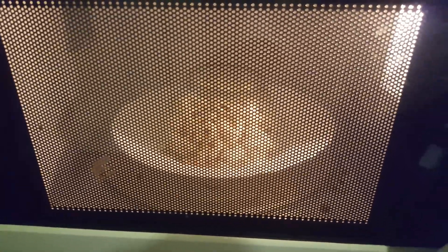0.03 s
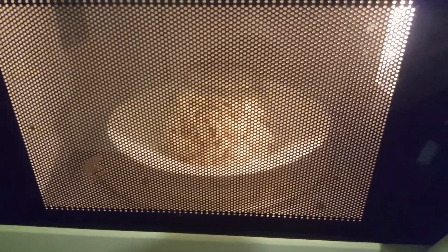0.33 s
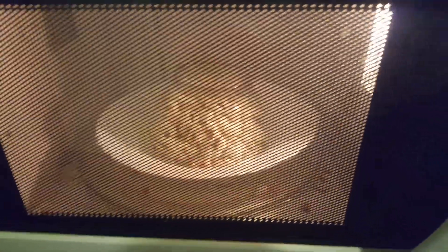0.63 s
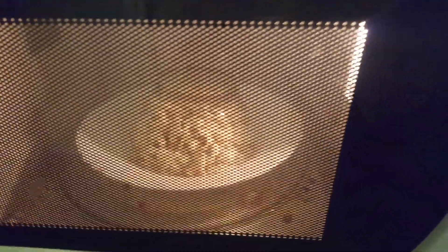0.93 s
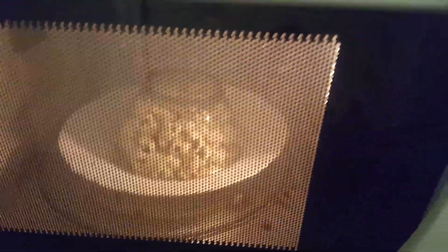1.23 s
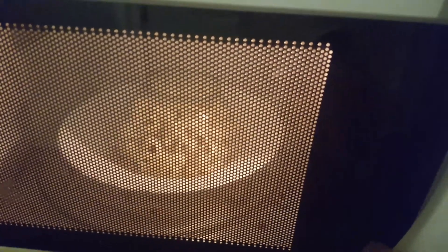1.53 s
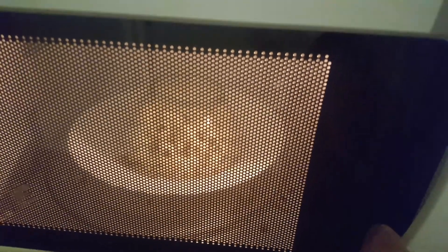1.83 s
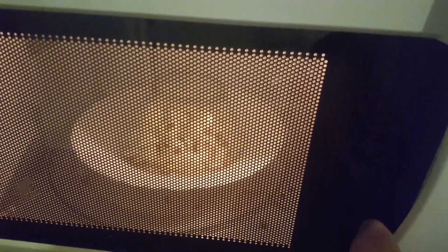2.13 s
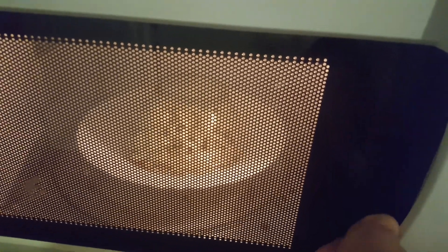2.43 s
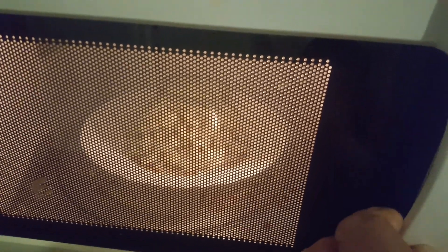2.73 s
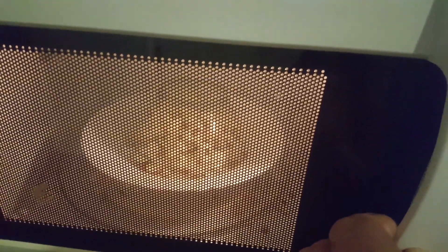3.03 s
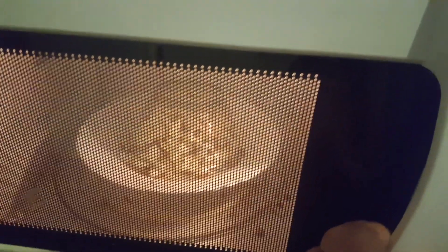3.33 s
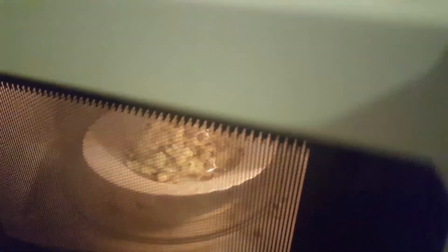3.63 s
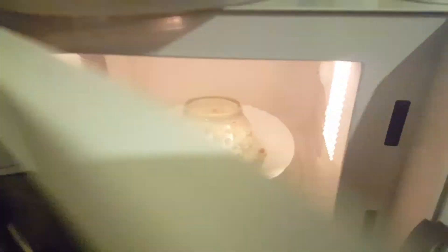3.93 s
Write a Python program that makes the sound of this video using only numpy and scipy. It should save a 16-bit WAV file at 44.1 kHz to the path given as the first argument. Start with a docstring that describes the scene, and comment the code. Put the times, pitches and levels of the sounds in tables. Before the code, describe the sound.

A microwave oven hums with a few faint popcorn pops, then its door clatters open.

```python
"""A small kitchen, close to the door of a running microwave oven. The transformer hums at harmonics of
the mains, the fan drones over the rush of its air, and a few popcorn kernels burst against the dish.
A thumb presses the door button, the power cuts, and the latch springs open with a clatter whose impacts
excite the modes of the steel cabinet and reverberate in the room. The fan coasts down, its drone
falling in pitch and level."""
import sys
import numpy as np
from scipy import signal
from scipy.fft import rfft, irfft
from scipy.io import wavfile

SR = 44100
rng = np.random.default_rng(int(sys.argv[2]) if len(sys.argv) > 2 else 0)


def materialize(psi):
    """Save the field psi as 16-bit PCM at rate SR to the path in sys.argv[1].

    A 1-D psi becomes a single channel; in a 2-D psi each row is a channel.
    """
    bounded = np.clip(np.atleast_2d(psi).T, -1, 1)
    quanta = np.round(bounded * 32767).astype(np.int16)
    wavfile.write(sys.argv[1], SR, quanta)


N = 176400
TIME = np.arange(N) / SR

# Balance of the two microphone ports (pan is left minus right): frequency_hz, pan_db
STEREO_BALANCE = [(280, 0), (420, 6), (600, -1.5), (1600, -4.5), (2800, -1), (3600, 9.5), (5200, 6),
                  (8500, 20.5), (13000, 8.5)]
# Likeness of the noise at left and right: frequency_hz, correlation
STEREO_CORRELATION = [(350, 0.93), (700, 0.25), (1400, 0.05)]
# Reverberation time of the kitchen: frequency_hz, t60_s
ROOM_DECAY = [(150, 0.36), (2000, .42), (5000, 0.51), (12000, 0.17)]
# Spectrum of the faint hiss: frequency_hz, relative_density_db
HISS_SPECTRUM = [(7000, -6), (15500, -10.5)]
# Envelope of the hiss: time_s, level_db
HISS_ENVELOPE = [(0, -84), (.3, -66), (1.85, -71), (1.97, -60), (2.8, -65.5), (4, -63)]
# Partials of the transformer hum: mains_multiple, level_db, pan_db
HUM_PARTIALS = [(2.004, -31, 2), (4.03, -46, -2.5), (4.993, -47, -1), (5.92, -46, 1), (12.9, -50.5, -2),
                (14.01, -53, -7.5), (14.97, -55.5, 8.5), (29.92, -59.5, -1.5)]
# Harmonics of the fan drone: shaft_multiple, level_db, pan_db, waver_db
FAN_HARMONICS = [(2, -54, 3, 1), (3, -44, 13, 2.5), (4, -23, 1.7, .5), (7, -46, -7, 4), (8, -47, 2.5, -1.5)]
# Spectrum of the fan's air: frequency_hz, relative_density_db
AIR_SPECTRUM = [(35, -18.5), (60, -11.5), (120, 3), (200, -2.5), (285, -0.5), (345, -5), (460, -3.5),
                (540, -8.5), (690, -7.5), (1030, -15), (1170, -12), (1370, -12.5), (1540, -12.5),
                (1780, -16), (2250, -20), (4500, -38), (8500, -46.5), (10500, -56.5), (15500, -56)]
# Spectrum of a soft rub: frequency_hz, relative_density_db
RUB_SPECTRUM = [(2000, -7), (3500, 1), (6000, -4.5), (10000, -17.5)]
# Kernels bursting against the dish: start_s, level_db, tilt_db_per_octave
KERNEL_BURSTS = [(1.4426, -25, 0.5), (1.773, -30.5, -7.5), (2.433, -36, 3.5)]
# Modes of the dish: pitch_hz, relative_level_db
DISH_MODES = [(690, -5.5), (1130, -1.5), (1490, -5), (2340, -8.5), (3015, -6.5)]
# Small high snaps: start_s, level_db, pitch_hz
HIGH_SNAPS = [(2.433, -45, 7650), (3.188, -52, 7300), (3.252, -40, 8330)]
# Creaks and clicks of the plastic button: start_s, level_db, tilt_db_per_octave, t60_s
BUTTON_CLICKS = [(3.252, -32, 5, 0.066), (3.276, -35, 2, .06), (3.366, -46, 8, 0.033),
                 (3.392, -49.5, 8.5, 0.13), (3.414, -30.5, 3.5, 0.11)]
# Knocks of the linkage and the door: start_s, level_db, tilt_db_per_octave, t60_s
DOOR_KNOCKS = [(3.364, -32.5, -11.5, 0.29), (3.452, -22, -3, 0.098), (3.458, -14.5, 2, 0.04),
               (3.463, -16, -3.5, 0.12), (3.481, -29.5, 6, 0.16), (3.502, -13.5, 2, 0.034),
               (3.507, -8, 2, 0.04), (3.511, -12.5, -5, 0.064), (3.529, -9, 1, 0.07),
               (3.544, -15, -4.5, 0.066), (3.554, -19, -3.5, 0.078), (3.804, -37, -3, .06)]
# Spectrum of a contact on door and cabinet: frequency_hz, relative_density_db
CONTACT_SPECTRUM = [(50, -22.5), (300, -6.5), (550, -2.5), (700, 2), (860, -1), (1750, 2.5), (2900, -8),
                    (3700, -16), (7000, -23), (8500, -23), (10000, -33.5), (13000, -33), (15500, -38.5)]
# Modes of the steel cabinet: pitch_hz, relative_level_db, t60_s, pan_db
CABINET_MODES = [(121.6, -25.5, 0.66, 2), (568.4, -14.5, 0.21, 1), (665, -15, 0.16, -7.5),
                 (709, -18, 0.39, -7), (1270, -14, 0.18, 2.5), (1460, -35, 1.38, -20.5),
                 (1704, -14.5, .11, -11), (1894, -20.5, 0.12, 6), (2019, -31.5, 0.67, -15),
                 (2860, -27.5, 0.16, -9.5), (3100, -29, 0.13, 9), (3628, -44, 0.7, 10)]

MAINS_HZ, TILT_PIVOT_HZ = 49.995, 1470


def from_db(db):
    """Amplitude grows tenfold for every 20 dB."""
    return 10 ** (np.asarray(db) / 20)


def at_hz(points, hz):
    """Interpolation of a table on a logarithmic frequency axis."""
    frequencies, values = np.transpose(points)
    return np.interp(np.log(hz), np.log(frequencies), values)


def panned(db):
    """A level difference gives direction: left and right gains whose mean is 1."""
    left = 2 / (1 + from_db(-np.atleast_1d(db)))
    return np.array([left, 2 - left])


def drift(corner_hz):
    """Low-pass filtered noise gives a random fluctuation with a standard deviation of 1."""
    step, settling = 40, 2000  # samples per draw; draws discarded while the filter settles
    pole = np.exp(-2 * np.pi * corner_hz * step / SR)
    white = rng.standard_normal(N // step + settling + 2)
    slow = signal.lfilter([1], [1, -2 * pole, pole * pole], white)[settling:]
    return np.interp(np.arange(N) / step, np.arange(len(slow)), slow / slow.std())


def swell(peak_s, rise_s, fall_s):
    """A Gaussian envelope with separate widths for rise and fall."""
    return np.exp(-((TIME - peak_s) / np.where(TIME < peak_s, rise_s, fall_s)) ** 2)


def damped(age_s, t60_s, attack_s=.00048):
    """Damping makes a vibration decay exponentially after its quick onset."""
    return (1 - np.exp(-age_s / attack_s)) * np.exp(-np.minimum(np.log(1000) * age_s / t60_s, 20))


def tone(cycles, rms_db, pan_db):
    """Simple harmonic motion that follows a running count of cycles."""
    return np.sqrt(2) * from_db(rms_db) * panned(pan_db) * np.sin(2 * np.pi * (cycles + rng.random()))


def noise(spectrum, ripple_depth_db=.96, ripple_spacing_hz=60):
    """Stereo noise of rms 1; interference of early reflections in the room ripples its spectrum."""
    hz = np.maximum(np.fft.rfftfreq(N, 1 / SR), 1)
    correlation = np.clip(at_hz(STEREO_CORRELATION, hz), -1, 1)
    mid, side = rfft(rng.standard_normal((2, N)))
    stereo = np.sqrt(1 + correlation) * mid + np.sqrt(1 - correlation) * side * [[1], [-1]]
    balance = panned(at_hz(STEREO_BALANCE, hz))
    bumps = np.interp(hz / ripple_spacing_hz, np.arange(600), rng.standard_normal(600))
    ripple_db = ripple_depth_db * np.minimum(hz / TILT_PIVOT_HZ, 1) * bumps
    colour = from_db(at_hz(spectrum, hz) + ripple_db) * (hz > 33)  # no deep rumble
    out = irfft(stereo * colour * balance / np.hypot(*balance), N)
    return out / out.std()


def noise_bands(spectrum):
    """Fourier filtering splits noise into half octaves: pairs of centre_hz, band."""
    hz = np.maximum(np.fft.rfftfreq(N, 1 / SR), 1)
    bins = rfft(noise(spectrum))
    edges_hz = 22 * 2 ** (np.arange(21) / 2)
    return [(np.sqrt(low * high), irfft(bins * ((hz >= low) & (hz < high)), N))
            for low, high in zip(edges_hz, edges_hz[1:])]


def resonant_noise(hz, half_width_hz):
    """A randomly driven resonance wanders in amplitude and phase."""
    phase = 2 * np.pi * hz * TIME
    vibration = drift(half_width_hz) * np.sin(phase) + drift(half_width_hz) * np.cos(phase)
    return vibration * panned(at_hz(STEREO_BALANCE, hz))


def hiss():
    """Slow amplitude modulation makes a faint hiss swell and fade."""
    return noise(HISS_SPECTRUM) * from_db(np.interp(TIME, *np.transpose(HISS_ENVELOPE)))


def transformer(off_s=3.33, fade_s=.06, waver_db=1.0):
    """Forced vibration near mains harmonics, the higher ones less steady, until the door switch opens."""
    hum = sum(tone(multiple * MAINS_HZ * TIME, db + waver_db * min(multiple / 10, 1) * drift(2.4), pan)
              for multiple, db, pan in HUM_PARTIALS)
    return hum * np.exp(-np.maximum(TIME - off_s, 0) / fade_s)


def fan(shaft_hz=40.6, off_s=3.494, half_speed_after_s=1.0, air_db=-32, flutter_db=.75):
    """Rotation gives harmonics and turbulence gives noise; both weaken as the shaft slows."""
    speed = (1 + .0015 * drift(2.53)) / (1 + np.maximum(TIME - off_s, 0) / half_speed_after_s)
    turns = shaft_hz * np.cumsum(speed) / SR
    octaves = np.log2(speed)
    drive_lost = .5 * (1 + np.tanh((TIME - 3.477) / .0038))  # the motor stops shaking the cabinet
    drive_db = 17 * octaves - 16 * drive_lost
    drone = sum(tone(multiple * turns, db + drive_db + waver_db * drift(4.7), pan)
                for multiple, db, pan, waver_db in FAN_HARMONICS)
    air = sum(band * from_db(flutter_db * drift(7.6)) for _, band in noise_bands(AIR_SPECTRUM))
    throb = 1 + .14 * np.sin(2 * np.pi * 2 * MAINS_HZ * TIME)
    return drone + air * throb * from_db(air_db + 20 * octaves)


def rub(peak_s=1.647, rise_s=.18, fall_s=.054, rub_db=-53, squeak_db=-55, squeak_lead_s=.045):
    """Sliding friction makes a brief soft noise and drives one narrow resonance into a thin squeak."""
    squeak = resonant_noise(3440, half_width_hz=140) * swell(peak_s - squeak_lead_s, rise_s, fall_s)
    friction = noise(RUB_SPECTRUM) * swell(peak_s, rise_s, fall_s)
    return squeak * from_db(squeak_db) + friction * from_db(rub_db)


def popcorn(t60_s=.028, crack_offset_db=-1):
    """Impulse excitation: each bursting kernel cracks and sets the modes of the dish ringing briefly."""
    out = contacts([(start_s, db + crack_offset_db, tilt, t60_s) for start_s, db, tilt in KERNEL_BURSTS])
    for start_s, db, tilt in KERNEL_BURSTS:
        age_s = np.maximum(TIME - start_s, 0)
        for hz, mode_db in DISH_MODES:
            amplitude = from_db(db + mode_db + tilt * np.log2(hz / TILT_PIVOT_HZ)) * rng.choice([-1, 1])
            ring = np.sin(2 * np.pi * hz * age_s) * damped(age_s, t60_s)
            out = out + panned(at_hz(STEREO_BALANCE, hz)) * amplitude * ring
    return out


def snaps(t60_s=.049):
    """Small hard parts snap, each exciting a narrow, damped high resonance."""
    return sum(resonant_noise(hz, 450) * from_db(db) * damped(np.maximum(TIME - start_s, 0), t60_s)
               for start_s, db, hz in HIGH_SNAPS)


def thumb_push(pitch_hz=82.6):
    """Elastic flexure: the casing gives under the thumb with a soft boom."""
    return tone(pitch_hz * TIME, rms_db=-34, pan_db=0) * swell(peak_s=3.3, rise_s=.05, fall_s=.05)


def contacts(impacts, room_db=-19.5, room_build_s=.048):
    """Impacts excite dense, quickly damped panel vibration; reverberation then builds and decays."""
    start_s, db, tilt, t60_s = np.transpose(impacts)
    age_s = np.maximum(TIME - start_s[:, None], 0)
    burst_power = damped(age_s, t60_s[:, None]) ** 2
    build_pole = np.exp(-1 / (room_build_s * SR))
    out = 0
    for hz, band in noise_bands(CONTACT_SPECTRUM):
        octaves = np.log2(np.clip(hz / TILT_PIVOT_HZ, .2, 10))
        direct_power = from_db(db + tilt * octaves) ** 2 @ burst_power
        decay_pole = np.exp(-2 * np.log(1000) / (at_hz(ROOM_DECAY, hz) * SR))
        feedback = np.convolve([1, -build_pole], [1, -decay_pole])
        room_power = signal.lfilter([1 - build_pole], feedback, direct_power) / (room_build_s * SR)
        out = out + band * np.sqrt(direct_power + from_db(room_db) ** 2 * np.abs(room_power))
    return out


def panel_modes(count=32, low_hz=889, high_hz=6090):
    """Sheet metal has many weak modes, here spread evenly in pitch, the highest fainter and shorter."""
    position = (np.arange(count) + rng.random(count)) / count
    hz = low_hz * (high_hz / low_hz) ** position
    pivot_ratio = np.maximum(hz / TILT_PIVOT_HZ, 1)
    mode_db = -39.5 - 4 * np.log2(pivot_ratio)
    t60_s = .5 / np.sqrt(pivot_ratio) * 2 ** rng.uniform(-.56, .44, count)
    pan_db = at_hz(STEREO_BALANCE, hz) + rng.normal(0, 6, count)
    return list(zip(hz, mode_db, t60_s, pan_db))


def cabinet(spread_db=.5):
    """Modal resonance: each knock adds energy to every mode of the steel cabinet; damping drains it."""
    start_s, knock_db = np.transpose(DOOR_KNOCKS)[:2]
    out = 0
    for hz, mode_db, t60_s, pan_db in CABINET_MODES + panel_modes():
        blow_db = knock_db + mode_db + spread_db * rng.standard_normal(len(start_s))
        blows = np.full(N, 1e-18)
        blows[(start_s * SR).astype(int)] = from_db(blow_db) ** 2
        decay_pole = np.exp(-2 * np.log(1000) / (t60_s * SR))
        energy = signal.lfilter([1], [1, -decay_pole], blows)
        ring = np.sqrt(energy) * np.sin(2 * np.pi * (hz * TIME + rng.random()))
        out = out + panned(pan_db) * ring
    return out


def scene():
    """Superposition: the pressures from the running oven, the popcorn and the opening door add."""
    background = transformer() + fan() + hiss()
    small_sounds = rub() + thumb_push() + popcorn() + snaps()
    door = contacts(BUTTON_CLICKS + DOOR_KNOCKS) + cabinet()
    return background + small_sounds + door


def record(dry):
    """An elliptic low-pass filter cuts the highest treble steeply."""
    cutoff_hz = 15800
    return signal.sosfilt(signal.ellip(10, .1, 80, cutoff_hz, fs=SR, output="sos"), dry)


dry = scene()
out = record(dry)
materialize(out)
```